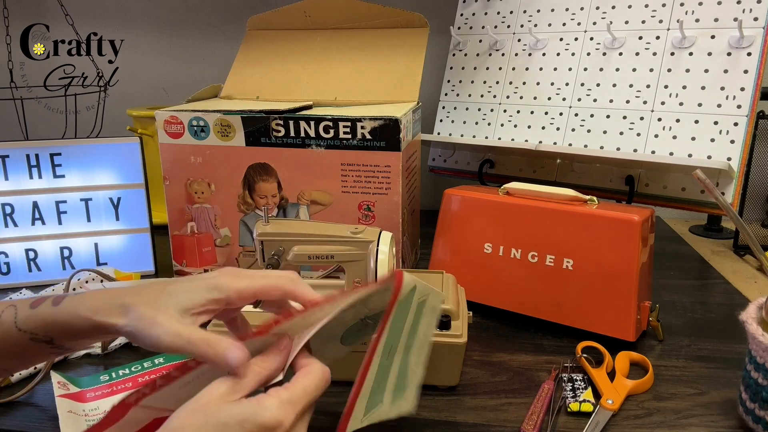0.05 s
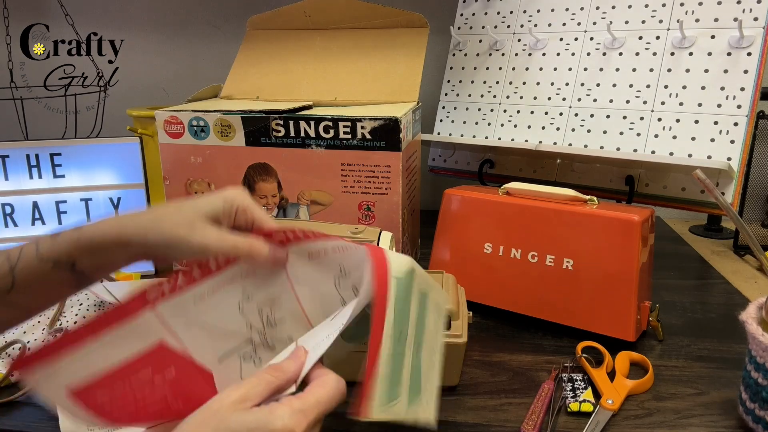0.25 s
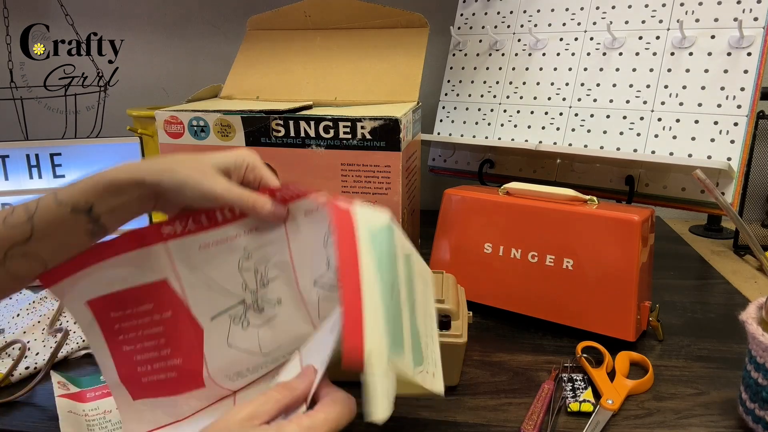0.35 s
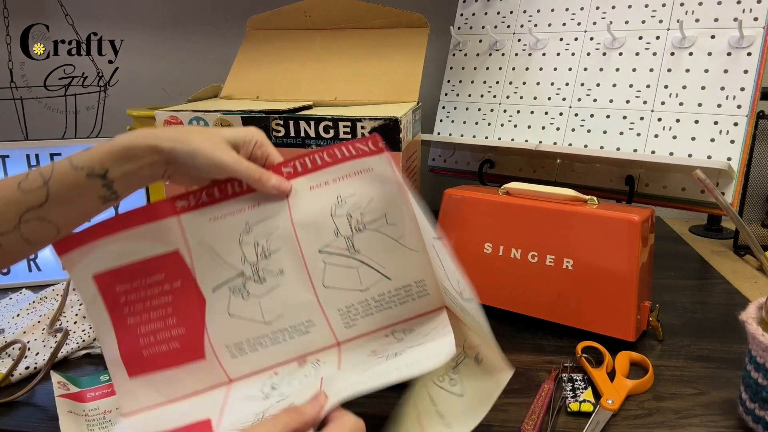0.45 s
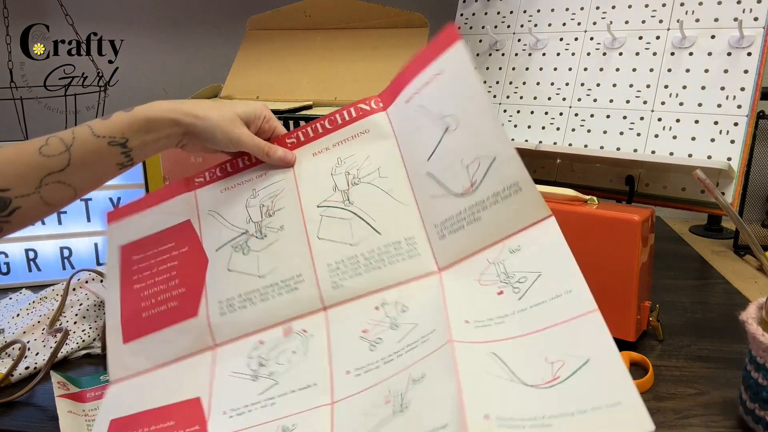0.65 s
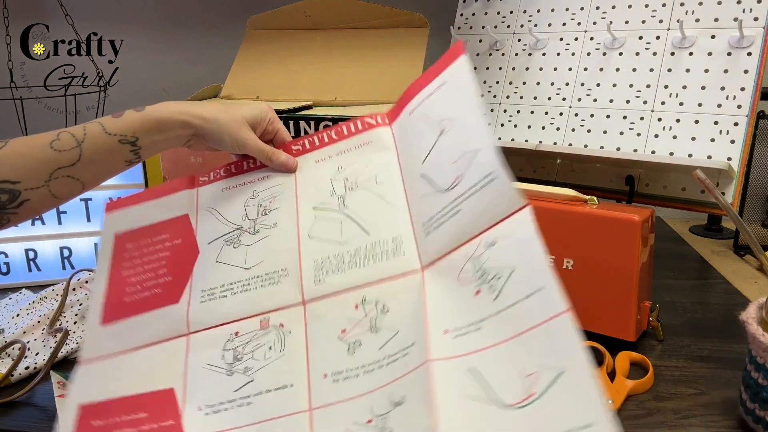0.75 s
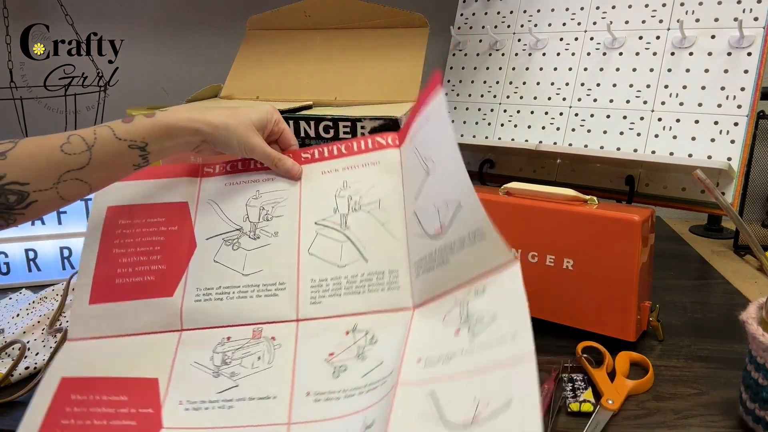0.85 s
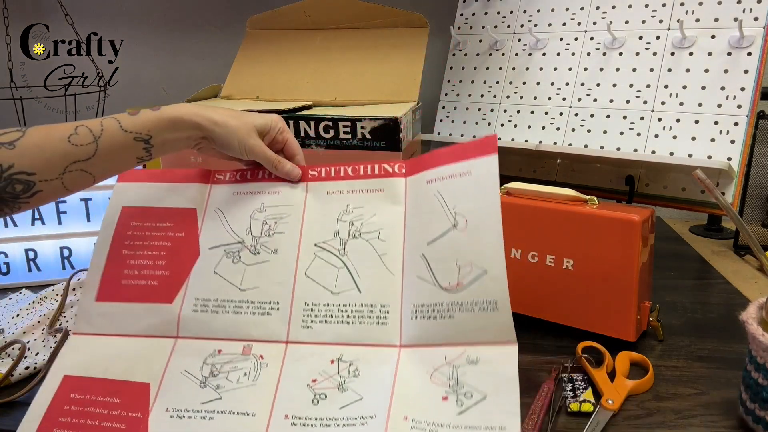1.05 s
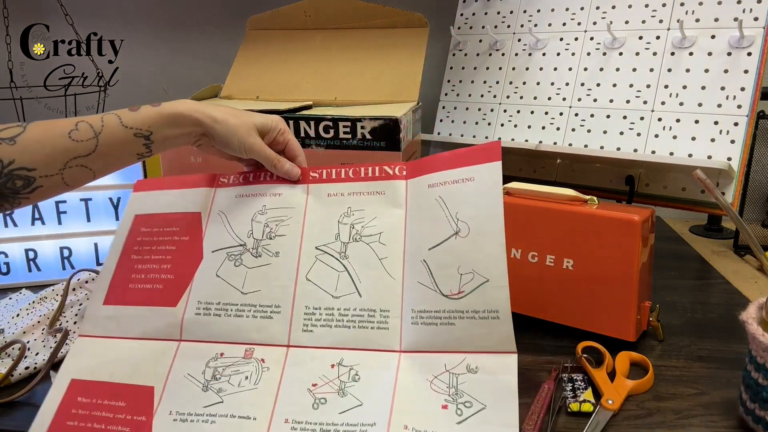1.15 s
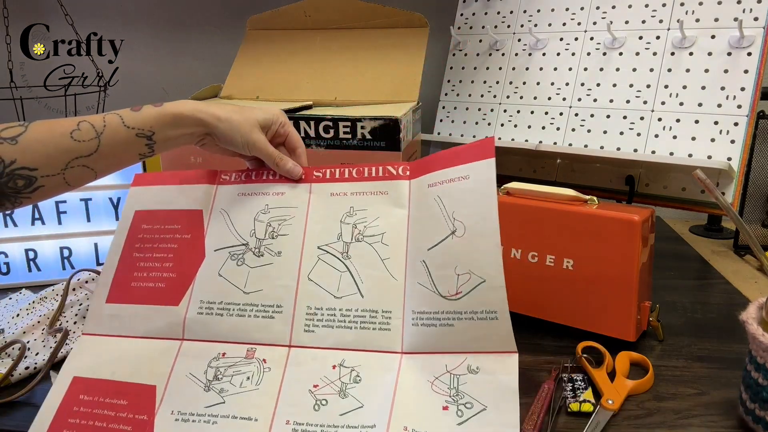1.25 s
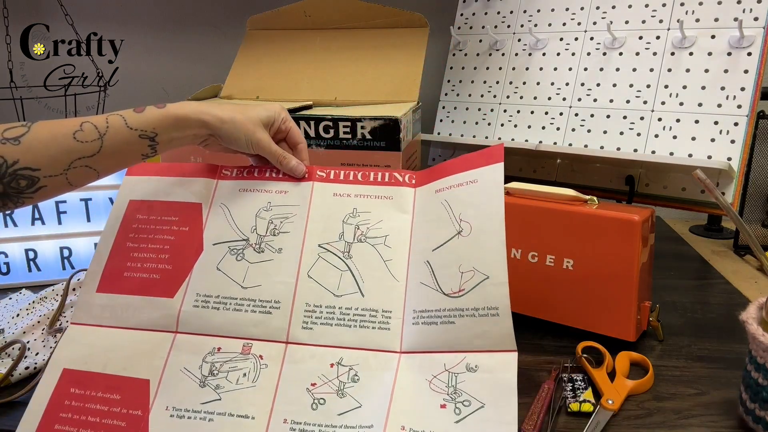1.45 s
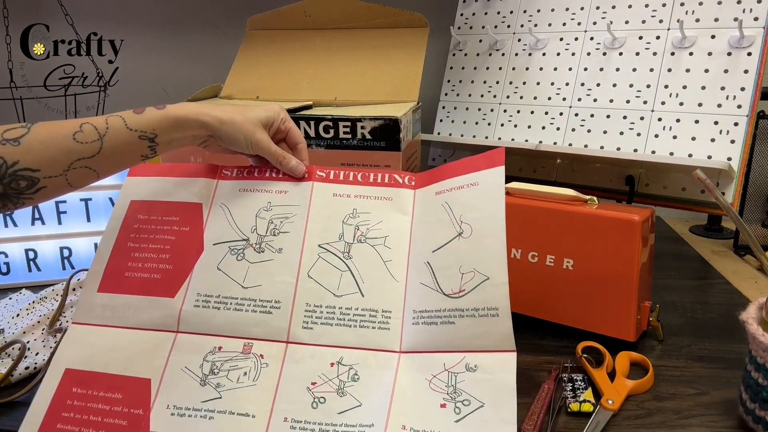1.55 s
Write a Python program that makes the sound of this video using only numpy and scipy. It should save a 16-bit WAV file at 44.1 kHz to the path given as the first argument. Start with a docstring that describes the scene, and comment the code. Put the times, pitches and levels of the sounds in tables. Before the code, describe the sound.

A stiff folded paper sheet is shaken open close to the microphone in a small quiet room. Its creases snap sharply amid crinkling, sliding hiss and low puffs of air, then it settles with a few dull buckles.

```python
"""A small quiet room, where a stiff folded paper sheet is shaken open and held up, close by.
Over a faint rumble the sheet fans the air in low puffs, its faces hiss as they slide over each other
and under the fingers, and tiny buckles crinkle as it bends. Up front, creases pop through in sharp
snaps and the panels flex with a hollow thud and a short ring. Then it settles with a few dull buckles."""
import sys
import numpy as np
from scipy import signal
from scipy.fft import rfft, irfft
from scipy.io import wavfile

SR = 44100
rng = np.random.default_rng(int(sys.argv[2]) if len(sys.argv) > 2 else 0)


def bounce(signal):
    """Save signal as a 16-bit WAV file at the path given by the first command-line argument."""
    frames = np.transpose(np.atleast_2d(signal))
    limited = np.clip(frames, -1, 1)
    pcm = np.round(limited * 32767).astype(np.int16)
    wavfile.write(sys.argv[1], SR, pcm)


N = 70560
TIME = np.arange(N) / SR

# Tone of the room's rumble: f/Hz, level/dB
RUMBLE_COLOUR = [(20, -3), (120, 1), (400, -22), (1000, -21.5), (3000, -27.5), (8000, -32), (16000, -49)]
# Reverb time of the room: f/Hz, T60/s
REVERB_TIMES = [(100, 0.62), (300, 0.42), (1000, .26), (4000, 0.26), (8000, .19), (16000, 0.3)]
# Puffs of air fanned by the sheet: t/s, level/dB
FANNING_LEVELS = [(0, -63), (.16, -62.5), (.22, -44.5), (.27, -54.5), (.30, -35), (.34, -53), (.362, -48),
                  (.41, -47.5), (.46, -30), (.53, -50), (.60, -39.5), (.67, -49.5), (.77, -41.5),
                  (.85, -56.5), (1.02, -49), (1.12, -65), (1.22, -70), (1.33, -49), (1.5, -75.5),
                  (1.6, -65.5)]
# Bassy tone of those puffs: f/Hz, level/dB
FANNING_COLOUR = [(20, -27), (40, -17), (62, -2.5), (100, -1.5), (135, 3.5), (185, -6), (300, -5),
                  (1000, -54.5)]
# Strokes of paper sliding on paper and skin: t/s, level/dB
SLIDING_LEVELS = [(0, -56.5), (.09, -64), (.16, -52), (.21, -50), (.26, -59), (.335, -52), (.37, -44),
                  (.435, -33), (.50, -60), (.56, -94), (.645, -49.5), (.68, -63), (.74, -51), (.80, -54),
                  (.89, -59.5), (.965, -59.5), (1.02, -54.5), (1.11, -59), (1.205, -78.5), (1.26, -55.5),
                  (1.30, -55.5), (1.38, -65.5), (1.425, -74), (1.462, -67.5), (1.49, -100), (1.6, -107)]
# Bright tone of that friction: f/Hz, level/dB
SLIDING_COLOUR = [(200, -3), (1000, -7), (2500, 2), (5000, 3), (8000, 4), (12000, 3.5), (16000, -4.5)]
# Crinkle rising and falling as the sheet bends: t/s, level/dB
CRINKLE_LEVELS = [(0, -59.5), (.11, -65.5), (.17, -55.5), (.20, -45.5), (.26, -70), (.31, -64), (.338, -60),
                  (.38, -33), (.46, -34.5), (.53, -42.5), (.61, -37.5), (.68, -45), (.73, -35.5),
                  (.80, -44), (.85, -47.5), (.95, -62), (1.03, -56.5), (1.09, -63), (1.2, -64),
                  (1.30, -59.5), (1.36, -61), (1.44, -87.5), (1.6, -74)]
# Body of the bending sheet: f/Hz, level/dB
SHEET_COLOUR = [(60, -8), (135, -14), (195, -15), (255, 11), (310, -8), (390, 9.5), (600, 4.5), (1400, -1),
                (2500, -5), (5000, -17.5), (9000, -35.5), (16000, -37.5)]
# Hollow body of a flexing panel: f/Hz, level/dB
PANEL_COLOUR = [(30, -38.5), (80, -12), (135, -6), (195, -7), (265, 1.5), (400, 3.5), (560, -6),
                (780, -3.5), (1300, -13), (4000, -43)]
# Ring of a panel, longer for the large, low ones: f/Hz, decay/s
PANEL_DECAYS = [(130, 0.02), (380, 0.0099), (2000, 0.0065)]
# Tone of a crack before its treble is rolled off: f/Hz, level/dB
CRACK_COLOUR = [(50, -29.5), (130, -19.5), (300, -4.5), (700, -0.5), (1500, 2.5), (3000, 0.5), (6500, -0.5),
                (10000, -5), (16000, -7)]
# Cue list of creases and panels popping through: t/s, crack level/dB, treble edge f/Hz,
# crack decay/ms, creak level/dB, thud level/dB, ring f/Hz, ring level/dB
SNAP_CUES = [(0.1852, -35.5, 3000, 3.4, -45.5, -29.5, 315, -33),
             (.203, -38, 3530, 24, -55, -35.5, 1280, -28), (0.213, -24, 13600, 1.6, -48, -36, 1266, -28),
             (0.2161, -22, 4960, 6.4, -44, -52, 737, -36), (0.243, -23, 2800, 2.0, -56, -35, 408, -31),
             (0.2814, -15.5, 13300, 3, -34, -35, 709, -22.5),
             (.283, -16, 9000, 3.45, -43, -30.5, 1478, -19.5),
             (0.3417, -25.5, 7900, 10.5, -52, -43.5, 1190, -37),
             (0.3501, -6, 15000, 1.8, -30, -31.5, 799, -22),
             (0.3527, -15, 12000, 4.2, -40, -35.5, 137, -26),
             (0.3718, -26, 7000, 18, -44, -28.5, 387, -16.5),
             (0.415, -25.5, 7900, 4, -49, -38, 2280, -21.5),
             (0.4508, -27.5, 5140, 21, -25, -26, 454, -22.5), (0.464, -24.5, 7950, 11, -27, -52, 1060, -32),
             (0.4726, -14, 9400, 3.2, -43, -68, 1760, -22.5),
             (.577, -25.5, 4500, 5, -27.5, -39.5, 1880, -30), (0.58, -22, 12200, 1.7, -52.5, -36, 503, -30),
             (0.5874, -22, 4540, 10.2, -20.5, -28, 418, -37),
             (.652, -35.5, 3000, 4.5, -61, -38.5, 790, -33), (0.695, -31.5, 4170, 18, -60.5, -35, 363, -47),
             (.710, -31.5, 4460, 5.3, -46, -29, 482, -29.5), (.760, -22, 8400, 3.9, -32, -29, 664, -25.5),
             (0.764, -16.5, 8600, 4.4, -26, -37, 1744, -20.5),
             (0.8207, -30, 3150, 21.4, -29, -28, 445, -24.5),
             (0.8264, -18, 12600, 2.74, -38, -24.5, 947, -28.5),
             (.830, -20.5, 9600, 3.3, -54, -36, 1250, -32),
             (.862, -37.5, 3000, 5.6, -59.5, -35.5, 411, -35.5),
             (0.978, -60, 1600, 17, -70, -43, 239, -47.5), (1.017, -48, 2800, 6, -45, -44, 394, -39),
             (1.097, -57.5, 1700, 11, -66.5, -50, 373, -52.5), (1.218, -48, 1880, 11, -71, -43, 306, -57),
             (1.266, -45, 1780, 4, -61, -38.5, 390, -43), (1.327, -46.5, 2190, 14, -58, -34, 511, -32.5),
             (1.337, -39.5, 1240, 14.3, -55.5, -39, 300, -49),
             (1.580, -44.5, 2260, 14.4, -68, -49.5, 465, -47)]

RUMBLE_DB = -68
REVERB_DB, REVERB_BUILD_S = -12.5, 0.0052
SLIPS_PER_S, SLIP_SPREAD_DB = 16000, 4
CRINKLES_PER_S, CRINKLE_SPREAD_DB, CRINKLE_RING_S = 1200, 1.5, 0.0015
FIBRES_PER_S, FIBRE_SPREAD_DB = 18000, 3
CREAK_RISE_S, CREAK_EDGE_HZ = 0.0061, 1000
SNAP_ATTACK_S, FIRST_CLICK_DB = 0.00025, 11  # the first click stands out from the fibre clicks after it
THUD_ATTACK_S, THUD_DECAY_S = 0.0026, 0.012
RING_ATTACK_S, RING_DETUNE = 0.0016, 0.011  # random detune, as a share of the pitch


def from_db(db):
    """Decibels to gain."""
    return 10 ** (np.asarray(db) / 20)


def unit_power(x):
    """Scale to an RMS of one."""
    return x / np.sqrt(np.mean(x ** 2) + 1e-20)


def unit_energy(x):
    """Scale so that the squares sum to one."""
    return x / np.sqrt(np.sum(x ** 2) + 1e-20)


def fader(levels):
    """Ride the gain along t/s, level/dB points."""
    return from_db(np.interp(TIME, *np.transpose(levels)))


def swell(t, attack_s, decay_s):
    """Quick rise and exponential decay, silent before time zero."""
    t = np.maximum(t, 0)
    return (1 - np.exp(-t / attack_s)) * np.exp(-t / decay_s)


def at_hz(points, hz):
    """Read a table on a log-frequency axis."""
    f, value = np.transpose(points)
    return np.interp(np.log(np.maximum(hz, 1)), np.log(f), value)


def through(x, response):
    """Pass a sound through an impulse response."""
    return signal.fftconvolve(x, response)[:len(x)]


def low_pass(x, edge_hz, order):
    """Roll off the treble above an edge."""
    return signal.sosfilt(signal.butter(order, edge_hz, fs=SR, output="sos"), x)


def resonance(colour, size=4096):
    """Causal (minimum-phase) impulse response with the given tone colour."""
    gains = from_db(at_hz(colour, np.fft.rfftfreq(size, 1 / SR)))
    cepstrum = irfft(np.log(gains))
    cepstrum[1:size // 2] *= 2
    cepstrum[size // 2 + 1:] = 0
    return irfft(np.exp(rfft(cepstrum)))


def noise(colour, size=4096):
    """Steady coloured noise of unit power."""
    return unit_power(through(rng.standard_normal(N + size), resonance(colour))[size:])


def grains(per_s, spread_db, size):
    """Random clicks of either sign, mostly small, a few large."""
    heights = from_db(spread_db * np.minimum(rng.exponential(1, size), 4))
    return heights * rng.choice([-1, 1], size) * (rng.random(size) < per_s / SR)


def room_rumble():
    """The quiet room lays a steady, low bed under everything."""
    return from_db(RUMBLE_DB) * noise(RUMBLE_COLOUR)


def room_reverb(x):
    """The small room adds a short diffuse tail that hangs longest in the bass."""
    t, edges_hz = TIME[:SR // 2], np.geomspace(50, 18000, 10)
    tail = 0
    for low, high in zip(edges_hz, edges_hz[1:]):
        band_pass = signal.butter(2, [low, high], "band", fs=SR, output="sos")
        band = signal.sosfilt(band_pass, rng.standard_normal(len(t)))
        t60_s = at_hz(REVERB_TIMES, np.sqrt(low * high))
        tail = tail + band * from_db(-60 * t / t60_s)
    fade_in = 1 - np.exp(-(t / REVERB_BUILD_S) ** 2)
    return x + from_db(REVERB_DB) * through(x, unit_energy(tail * fade_in))


def fanning():
    """The moving sheet pushes air in soft, low puffs."""
    return fader(FANNING_LEVELS) * noise(FANNING_COLOUR)


def sliding():
    """Paper rubs on paper and skin: dense fine slips blur into a bright hiss."""
    slips = grains(SLIPS_PER_S, SLIP_SPREAD_DB, N)
    return fader(SLIDING_LEVELS) * unit_power(through(slips, resonance(SLIDING_COLOUR)))


def crinkle(size=1024):
    """Tiny buckles ring briefly in the sheet while it bends."""
    ring = rng.standard_normal(size) * np.exp(-TIME[:size] / CRINKLE_RING_S)
    buckles = grains(CRINKLES_PER_S, CRINKLE_SPREAD_DB, N)
    ringing_power = np.abs(through(buckles ** 2, ring ** 2))
    shiver = np.sqrt(ringing_power) * rng.standard_normal(N)
    return fader(CRINKLE_LEVELS) * unit_power(through(shiver, resonance(SHEET_COLOUR)))


def fibre_burst(envelope, response):
    """Fibres give way in a run of clicks, coloured by the response, with the envelope's energy."""
    clicks = grains(FIBRES_PER_S, FIBRE_SPREAD_DB, len(envelope))
    return unit_energy(through(clicks * envelope, response)) * np.sqrt(np.sum(envelope ** 2))


def panel_ring(t, pitch_hz):
    """A popped panel rings briefly at its own pitch."""
    detuned_hz = pitch_hz * (1 + RING_DETUNE * rng.standard_normal())
    envelope = swell(t, RING_ATTACK_S, at_hz(PANEL_DECAYS, pitch_hz))
    return envelope * np.sin(2 * np.pi * detuned_hz * t)


def snaps(size=6000):
    """Each pop: a creak as strain builds, a crack (duller for a soft buckle), then thud and ring."""
    lead = size // 4  # samples of pre-roll for the creak
    t = (np.arange(size) - lead) / SR
    track = np.zeros(N + size)
    paper, panel = resonance(CRACK_COLOUR), resonance(PANEL_COLOUR)
    for time_s, crack_db, edge_hz, decay_ms, creak_db, thud_db, ring_hz, ring_db in SNAP_CUES:
        click = low_pass(paper, edge_hz, order=3)
        strain = swell(-t, SNAP_ATTACK_S, CREAK_RISE_S)  # reversed, so it swells into the hit
        creak = fibre_burst(strain, low_pass(click, CREAK_EDGE_HZ, order=1))
        crack = fibre_burst(swell(t, SNAP_ATTACK_S, decay_ms / 1000), click)
        crack[lead:lead + len(click)] += from_db(FIRST_CLICK_DB) * unit_energy(click)
        thud = fibre_burst(swell(t, THUD_ATTACK_S, THUD_DECAY_S), panel)
        bite = from_db(creak_db) * creak + from_db(crack_db) * crack
        body = from_db(thud_db) * thud + from_db(ring_db) * panel_ring(t, ring_hz)
        start = int(time_s * SR)
        track[start:start + size] += bite + body
    return track[lead:lead + N]


def scene():
    """Mono mix: the paper with its reverb, over the fanned air and the room's rumble."""
    sheet = room_reverb(snaps() + crinkle() + sliding())
    return (sheet + fanning() + room_rumble())[None]


def record(dry, ceiling=0.72, cutoff_hz=16000):
    """A soft clip rounds the tallest peaks, then a steep low-pass trims the top."""
    rounded = dry / (1 + (dry / ceiling) ** 4) ** 0.25
    return signal.sosfilt(signal.ellip(10, 0.2, 70, cutoff_hz, fs=SR, output="sos"), rounded)


dry = scene()
out = record(dry)
bounce(out)
```